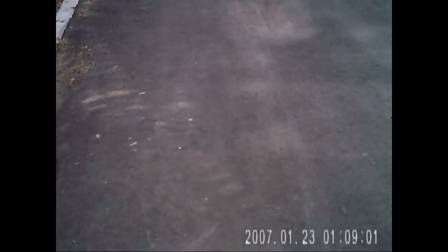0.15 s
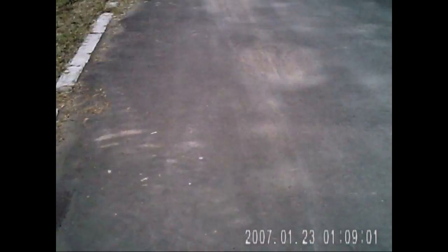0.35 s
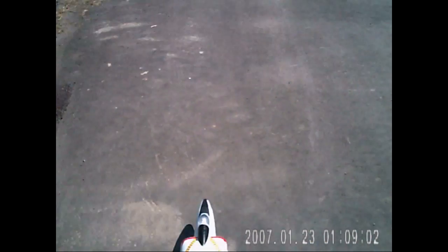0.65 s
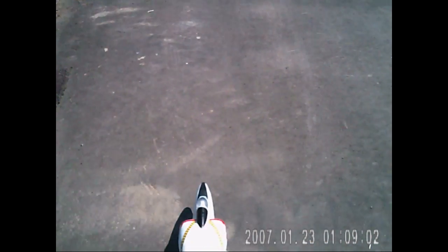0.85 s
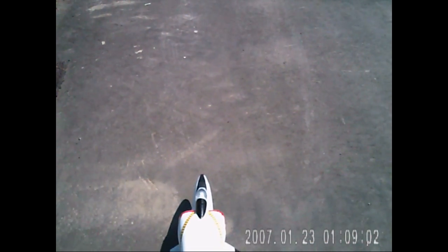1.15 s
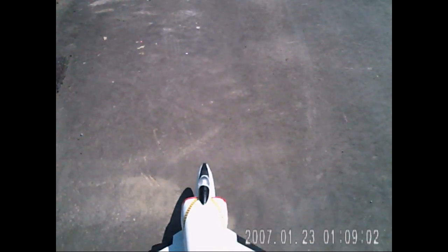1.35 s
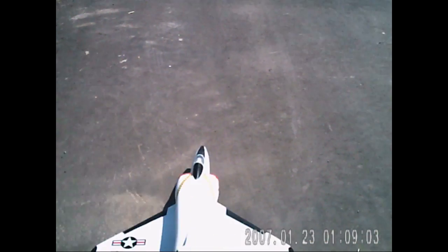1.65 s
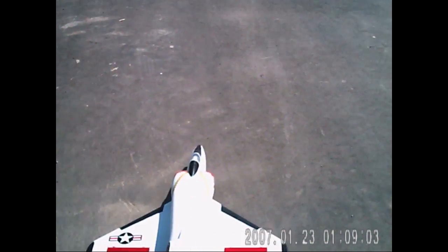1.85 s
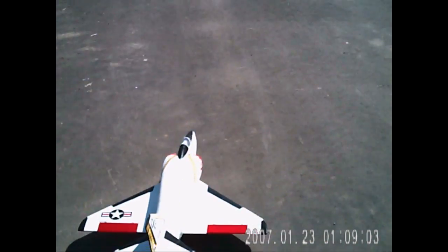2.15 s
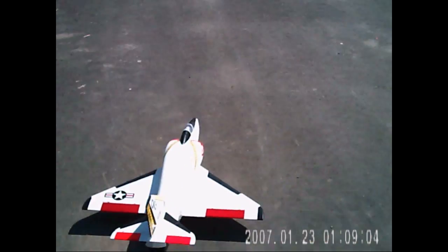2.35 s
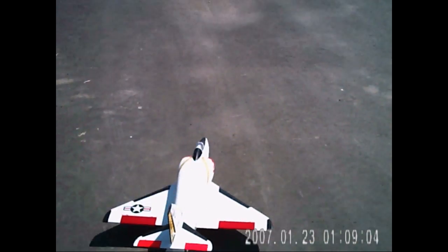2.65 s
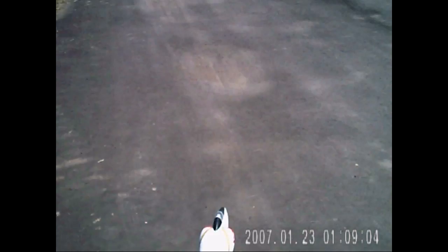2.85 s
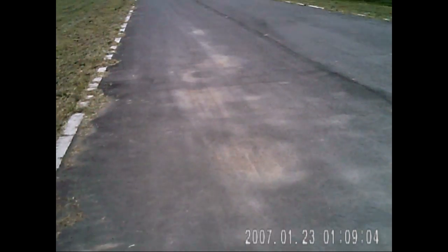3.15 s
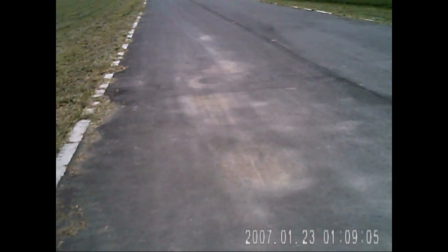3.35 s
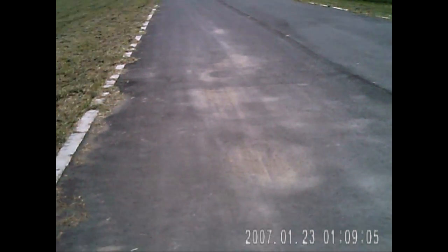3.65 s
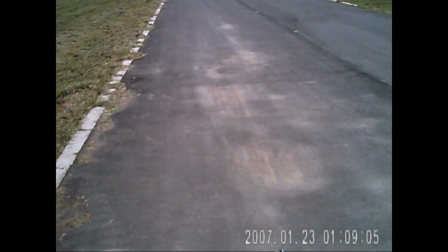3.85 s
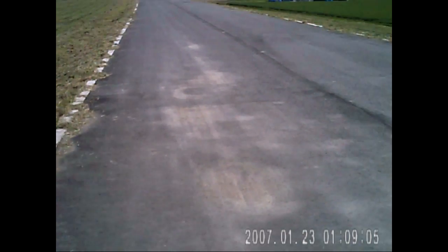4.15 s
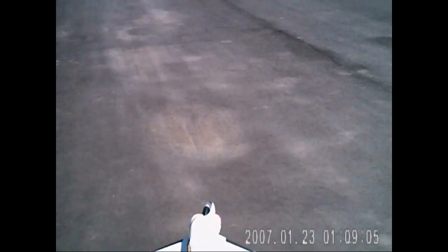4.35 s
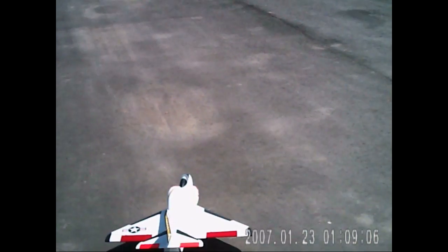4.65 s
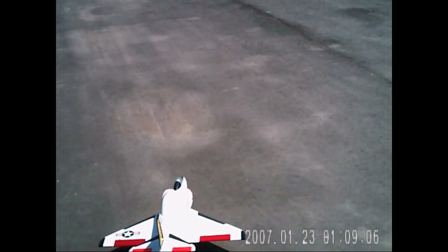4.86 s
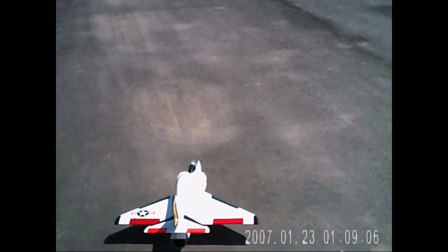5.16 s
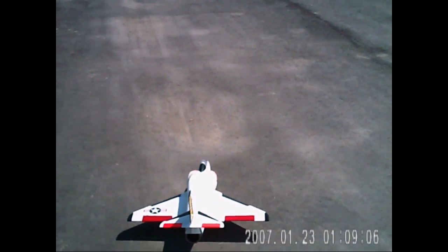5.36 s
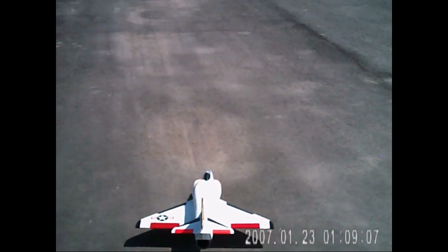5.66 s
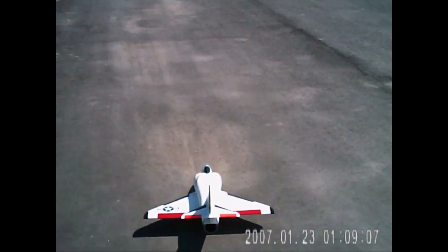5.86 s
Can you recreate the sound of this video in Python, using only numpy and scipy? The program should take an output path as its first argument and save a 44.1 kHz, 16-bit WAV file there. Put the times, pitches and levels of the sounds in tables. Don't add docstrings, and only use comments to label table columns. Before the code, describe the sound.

After faint hum and a few clicks, a model jet's motor whines shrilly, dips, and revs again while gusts thump a crude microphone.

```python
import sys
import numpy as np
from scipy import signal
from scipy.fft import rfft, irfft, next_fast_len
from scipy.io import wavfile
from scipy.ndimage import uniform_filter1d

SR = 44100
rng = np.random.default_rng(int(sys.argv[2]) if len(sys.argv) > 2 else 0)


def unload_audio(sound):
    columns = np.transpose(np.atleast_2d(sound))
    steps = np.round(np.clip(columns, -1, 1) * 32767)
    wavfile.write(sys.argv[1], SR, steps.astype(np.int16))


def invert_db(level):
    return 10 ** (np.asarray(level, dtype=float) / 20)


N = 264159
CAMERA_SR = 8000
BLADES = 5

THROTTLE_HZ = [125.6, 159.6, 224.7, 268]
# multiple of shaft speed, level in dB.
ORDERS_IDLE = [(1, -20), (2, -25.5), (3, -14.5), (4, -19), (5, -3), (6, 4.5), (7, -8.5), (8, -10.5),
               (9, -10), (10, -1.5), (11, -7.5), (12, -1), (13, -15)]
ORDERS_LOW = [(1, -9), (2, -11.5), (3, 2), (4, -10), (5, 0), (6, -6.5), (7, -2.5), (8, -1), (9, -10),
              (10, -11), (11, -8.5), (12, -9.5), (13, -9)]
ORDERS_MIDDLE = [(1, -3), (2, -2), (3, -2), (4, -2), (5, -1.5), (6, 0), (7, -10), (8, -15), (9, -13.5),
                 (10, -6), (11, -10.5), (12, -11.5), (13, -26)]
ORDERS_HIGH = [(1, -1), (2, -.5), (3, -3), (4, -11), (5, -4), (6, -6.5), (7, -10.5), (8, -4.5), (9, -16),
               (10, -9), (11, -20), (12, -24), (13, -21)]
# multiple of shaft speed, level in dB.
HALF_ORDERS = [(1.5, -21.5), (2.5, -2.5), (3.5, -5.5), (4.5, -2.5), (5.5, 0.5), (6.5, -7)]
SHAFT_UNDER_DB = [-17, -20, -7.5, -6]
BLADE_UNDER_DB = [-0.5, -6.5, -5, -7.5]
WOBBLE_UNDER_DB = [-10, -19.5, -21, -26]
RASP_UNDER_DB = [-6, -7.5, -8, -18]
BLADE_THIRD_DB = [-18, -9, -22, -16]
# start in seconds, shaft speed asked for in Hz, length in seconds.
STICK_MOVES = [(.570, 195.1, .05), (0.635, 158.3, 0.15), (1.081, 275.4, .19), (1.414, 240.3, 0.064),
               (1.572, 276.5, .1), (1.904, 234.2, 0.22), (2.214, 220.3, 0.29), (3.213, 224.0, 0.051),
               (3.508, 179.0, 0.47), (3.621, 153.6, 0.038), (3.719, 96.1, 0.47), (4.15, 200.0, 0.12),
               (4.254, 228.8, .2), (4.554, 214.0, 0.14), (4.857, 220.2, 0.26), (5.261, 184.9, 0.12),
               (5.441, 255.5, 0.17), (5.728, 282.3, 0.28)]
# time in seconds, whine at cruise speed in dB, aim of the efflux in dB.
ROLL_AWAY = [
    (.6, -24.5, 0),
    (1.2, -21.5, 0),
    (1.55, -22.5, -0.7),
    (1.9, -23, -0.4),
    (2.3, -22, 1),
    (3.05, -24.5, 1.5),
    (3.6, -25.5, -1),
    (4.55, -27.5, -1.2),
    (5.2, -27, -0.5),
    (5.97, -29, 0.5),
]
# frequency in Hz, gain in dB.
PATH_RESPONSE = [(200, -4), (450, 0), (800, 2.5), (1000, -2), (1280, 3), (1650, -5.5), (2100, -0.5),
                 (2600, 0.5), (3000, -1), (3600, -17.5)]
# centre in Hz, half width in Hz, gain in dB.
DUCT_RESONANCES = [(544, 36, 1.5), (1224, 65, 4), (1822, 79, 5.5), (2479, 53, 5.5), (2750, 38, 1)]
# frequency in Hz, level in dB per Hz.
AIR_SPECTRUM = [(80, -24), (200, -24), (400, -16.5), (800, -10), (1250, -7.5), (1650, -10), (2100, -3.5),
                (2650, -7.5), (2900, -13.5), (3200, -16), (3600, -11), (4000, -9)]
RASP_SPECTRUM = [(250, -39), (450, -11), (800, -7.5), (1250, -1), (1480, -6.5), (1700, -21), (2500, -45)]
RATTLE_SPECTRUM = [(250, -31), (450, -8.5), (750, -3.5), (1000, -10), (1700, -14), (2400, -15), (3100, -25),
                   (4000, -21.5)]
GUST_SPECTRUM = [(15, -32), (40, -3.5), (90, -6), (170, -8), (320, -12), (550, -21.5), (900, -38)]
# start in seconds, peak in dB, length in seconds, rattle share from 0 to 1.
MOTOR_JERKS = [(0.467, -41, 0.0053, 0.1), (0.471, -28, 0.0054, 0.84), (0.477, -23.5, 0.004, 0.63),
               (0.488, -33, 0.0051, 0.05), (0.502, -31.5, 0.003, 0), (0.515, -31, 0.008, .3),
               (0.528, -30, 0.0036, 0), (0.627, -26, .005, 0.8), (0.64, -28, .004, 0),
               (0.664, -22, 0.0036, .8), (0.69, -24.5, 0.0042, 0.2)]
# start in seconds, end in seconds, level in dB.
ROTOR_SCRAPES = [
    (0.466, .54, -37),
    (0.542, 0.612, -40.5),
    (0.614, 0.697, -39),
]
# time of peak in seconds, peak in dB, rise in seconds, fall in seconds.
WIND_GUSTS = [(.68, -50, 0.12, .05), (1.29, -49, 0.06, .25), (1.69, -42.5, 0.061, 0.081),
              (1.99, -43, .06, 0.056), (2.54, -57, 0.04, .03), (2.91, -56, .04, 0.039),
              (3.2, -50, 0.097, 0.042), (3.31, -40, 0.021, 0.087), (3.43, -36.5, 0.039, 0.049),
              (3.52, -30.5, 0.049, .1), (3.68, -41.5, .05, 0.047), (3.86, -40.5, 0.074, 0.057),
              (3.99, -30, .02, .012), (4.07, -34, 0.027, 0.082), (4.27, -34, 0.021, 0.054),
              (4.4, -36, 0.099, 0.14), (4.569, -29, .05, 0.057), (4.75, -33, 0.089, 0.064),
              (4.96, -33, 0.097, 0.031), (5.0, -34, 0.052, 0.027), (5.091, -27.5, 0.029, 0.029),
              (5.15, -39.5, .03, 0.14), (5.53, -36, 0.0075, 0.021), (5.69, -30, 0.11, .025),
              (5.88, -45, 0.11, 0.092)]
# frequency in Hz, level in dB.
CIRCUIT_LINES = [(64.6, -59), (769.8, -47)]


def fan():
    hz, pull = rotor_speed()
    whine_db, shaft_db, air_db, blade_db, wobble_db, rasp_db, behind_db = levels(hz, pull)
    turn = 2 * np.pi * np.cumsum(hz) / SR
    bright = invert_db(0.6 * (air_db - whine_db + 7.5))
    whine, blade_tone = shaft_orders(hz, pull, turn, bright, behind_db)
    blades = np.sqrt(2) * invert_db(blade_db) * blade_tone
    third_db = np.interp(hz, THROTTLE_HZ, BLADE_THIRD_DB) + 2.5 * walk(8)
    third = invert_db(third_db) * np.sin(3 * BLADES * turn + 0.4 * walk(25))
    shaft_db = np.minimum(shaft_db, whine_db - 3 - 0.16 * np.maximum(215 - hz, 0))
    shaft = np.sqrt(2) * invert_db(shaft_db + 0.75 * walk(15)) * np.cos(turn)
    wobble = half_orders(hz, turn, wobble_db, behind_db)
    tones = (whine + bright * third) * invert_db(whine_db - 3) + shaft + blades + wobble
    rasp = noise(RASP_SPECTRUM) * invert_db(rasp_db + 1.7 * walk(40)) * invert_db(whine_db - 2)
    air = noise(AIR_SPECTRUM) * (1 + 0.22 * np.sin(turn + 0.92)) * invert_db(0.74 * walk(30))
    spin_up = np.clip((np.arange(N) / SR - 0.58) / 0.05, 0, 1)
    return spin_up * (tones + rasp + air * invert_db(air_db + 1.5))


def shaft_orders(hz, pull, turn, bright, behind_db):
    upper_lag = 1.5
    ahead = turn + 2 * np.pi / 4.8
    spread = np.clip((250 - hz) / 40, 0, 2)
    strength = np.array([ORDERS_IDLE, ORDERS_LOW, ORDERS_MIDDLE, ORDERS_HIGH])[:, :, 1]
    path_hz, path_db = np.transpose(PATH_RESPONSE)
    whine, power = 0, 0
    for k in range(2, strength.shape[1] + 1):
        order_db = np.interp(hz, THROTTLE_HZ, strength[:, k - 1])
        size = invert_db(order_db + np.interp(np.log(k * hz), np.log(path_hz), path_db))
        jitter = 0.016 * k * (1 + 3 * abs(pull)) * walk(25)
        phase = 0.5 - upper_lag * (k > BLADES) + spread * rng.standard_normal() + jitter
        flutter_db = np.sqrt(k / BLADES) * (1.2 * walk(9) + 1.2 * walk(60))
        tone = np.cos(k * ahead + phase) * lift(k * hz, behind_db) * invert_db(flutter_db)
        if k <= 6:
            power = power + size ** 2 / 2
        if k == BLADES:
            blade_tone = tone
        else:
            whine = whine + size * (bright if k > 6 else 1) * tone
    return whine / np.sqrt(power), blade_tone


def half_orders(hz, turn, wobble_db, behind_db):
    wobble = 0
    for k, db in HALF_ORDERS:
        tone = np.sin(k * turn + 0.27 * walk(20))
        wobble = wobble + invert_db(db + 1.6 * walk(5.3)) * lift(k * hz, behind_db) * tone
    outside_db = np.clip(1.3 * (hz - 221.5), 0, 9) + 0.5 * np.maximum(190 - hz, 0)
    return wobble * np.sqrt(2) * invert_db(wobble_db + 0.5 - outside_db)


def rotor_speed():
    catch_hz, lag_s = 119.77, 0.1086
    t, moves = np.arange(N) / SR, np.array(STICK_MOVES)
    steps = np.diff(np.r_[catch_hz, moves[:, 1]])
    asked = 0
    for step, (start, _, length) in zip(steps, moves):
        asked = asked + step * np.clip((t - start) / length, 0, 1)
    keep = np.exp(-1 / (lag_s * SR))
    hz = catch_hz + signal.lfilter([1 - keep], [1, -keep], asked)
    return hz, (catch_hz + asked) / hz - 1


def levels(hz, pull):
    t, octaves = np.arange(N) / SR, np.log2(hz / 220)
    roll_s, away, aim = np.transpose(ROLL_AWAY)
    away_db, aim_db = np.interp(t, roll_s, away), np.interp(t, roll_s, aim)
    behind_db = away_db - away_db.max()
    driving = np.maximum(pull, 0)

    def under(db):
        return np.interp(hz, THROTTLE_HZ, db)

    def burst(s):
        return np.exp(-((t - s) / 0.035) ** 2)

    weak_db = np.clip(0.7 * (177 - hz), 0, 5.5)
    whine = away_db + 17.5 * octaves - weak_db + 4.5 * driving
    air = -31.5 + 17 * octaves + aim_db + 0.5 * pull + 4.5 * burst(1.195)
    vane_db = -3.5 * np.exp(-((hz - 232.5) / 7.8) ** 2)
    stall_s = 1.485
    blade = whine + under(BLADE_UNDER_DB) + 0.36 * behind_db - 19.5 * driving
    blade = blade + vane_db - 18 * burst(stall_s)
    rasp = under(RASP_UNDER_DB) - 0.3 * behind_db + 12 * burst(stall_s + 0.05)
    shaft = whine + under(SHAFT_UNDER_DB) + 0.55 * behind_db
    wobble = whine + under(WOBBLE_UNDER_DB) - 0.87 * behind_db
    return whine, shaft, air, blade, wobble, rasp, behind_db


def lift(hz, behind_db):
    grid = np.arange(0., CAMERA_SR / 2)
    peaks = 0
    for centre, width, db in DUCT_RESONANCES:
        peaks = peaks + db * np.exp(-((grid - centre) / width) ** 2)
    notch = np.exp(-((grid - 1322) / 55) ** 2)
    notch_db = 0.2 * behind_db ** 2 * np.interp(hz, grid, notch)
    return invert_db(np.interp(hz, grid, peaks) - notch_db)


def motor_jerks():
    mount_hz, edge_s = 707, 0.012
    t, ring, rattle = np.arange(N) / SR, 0, 0
    for start, end, db in ROTOR_SCRAPES:
        rattle = rattle + invert_db(db) * np.clip(np.minimum(t - start, end - t) / edge_s + 0.5, 0, 1)
    rattle = rattle * invert_db(3.2 * walk(90))
    for start, db, length, share in MOTOR_JERKS:
        age = np.maximum(t - start, 0)
        shape = invert_db(db) * (1 - np.exp(-age / 0.0011)) * np.exp(-age / max(length, 0.002))
        ring = ring + 1.6 * (1 - share) * shape * np.sin(2 * np.pi * mount_hz * age)
        rattle = rattle + share * shape
    return ring + rattle * noise(RATTLE_SPECTRUM)


def wind():
    t = np.arange(0, N / SR, 0.001)
    power = invert_db(-65.5) ** 2
    for peak, db, rise, fall in WIND_GUSTS:
        away = np.where(t < peak, (peak - t) / max(rise, 0.005), (t - peak) / max(fall, 0.005))
        power = power + invert_db(db - 10 * away) ** 2
    swell = np.interp(np.arange(N) / SR, t, np.sqrt(power))
    return noise(GUST_SPECTRUM) * swell * invert_db(2.2 * walk(45))


def circuit_hum():
    t = np.arange(N) / SR
    hum = sum(np.sqrt(2) * invert_db(db) * np.sin(2 * np.pi * hz * t) for hz, db in CIRCUIT_LINES)
    return hum * invert_db(-1.5 * (t > 0.5))


def converter(sound):
    steps, offset, hiss_db = 128, -0.751, -54
    t = np.arange(N) / SR
    ticks = np.arange(int(N / SR * CAMERA_SR) + 2) / CAMERA_SR
    volts = np.interp(ticks, t, sound) + invert_db(hiss_db) * rng.standard_normal(len(ticks))
    codes = np.clip(np.round(steps * (volts + offset)), -steps, steps - 1)
    played = np.floor(np.interp(t, ticks, codes) + 0.5) / steps
    return played, offset


def noise(points):
    hz, db = np.transpose(points)
    n = next_fast_len(N)
    f = np.maximum(np.arange(n // 2 + 1) * SR / n, 1)
    gain = invert_db(np.interp(np.log(f), np.log(hz), db, right=-90))
    x = irfft(rfft(rng.standard_normal(n)) * gain, n)[:N]
    return x / x.std()


def walk(rate):
    k = int(SR / rate)
    held = np.repeat(rng.standard_normal(N // k + 1), k)
    return 1.1 * uniform_filter1d(uniform_filter1d(held, k), k)[:N]


def scene():
    return (fan() + motor_jerks() + wind())[None]


def roll_off(x):
    return signal.sosfilt(signal.butter(12, 15010, fs=SR, output="sos"), x)


def record(dry):
    played, offset = converter(dry[0] + circuit_hum())
    rate_tone = np.sqrt(2) * invert_db(-68.5) * np.cos(2 * np.pi * CAMERA_SR * np.arange(N) / SR + 1)
    high_pass = signal.ellip(10, 0.1, 60, 14400, "high", fs=SR, output="sos")
    top = signal.sosfiltfilt(high_pass, played - offset)
    loudness = np.sqrt(uniform_filter1d(dry[0] ** 2, size=2048)) * invert_db(2.5 * walk(40))
    closed = uniform_filter1d(1. * (loudness < invert_db(-22.3)), size=512)
    played = played - top * closed
    return roll_off(np.clip(played + rate_tone, -1, 1)[None])


dry = scene()
out = record(dry)
unload_audio(out)
```